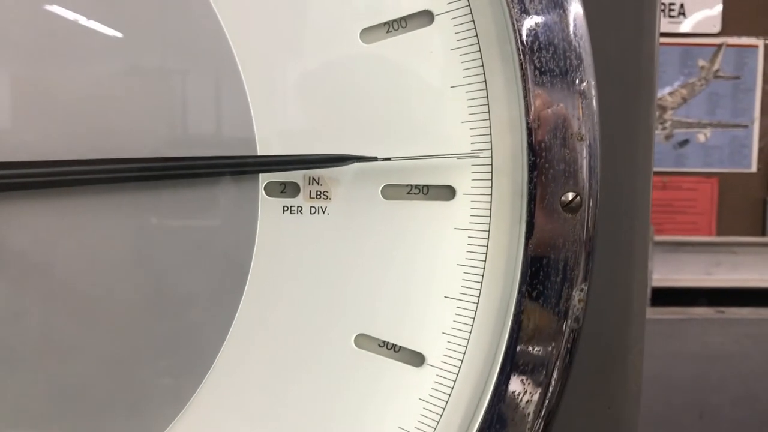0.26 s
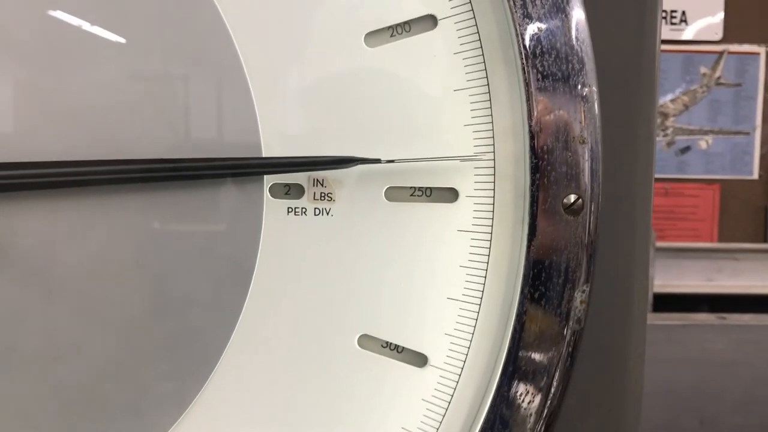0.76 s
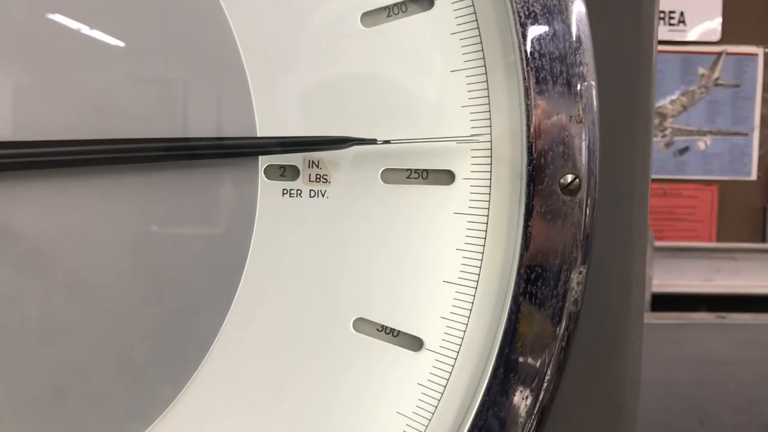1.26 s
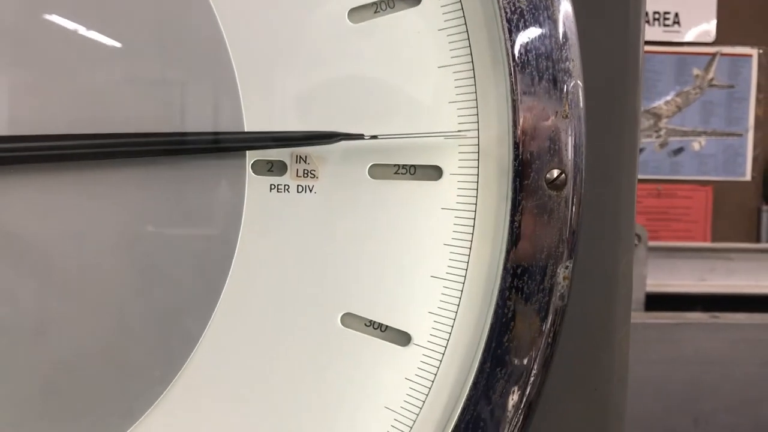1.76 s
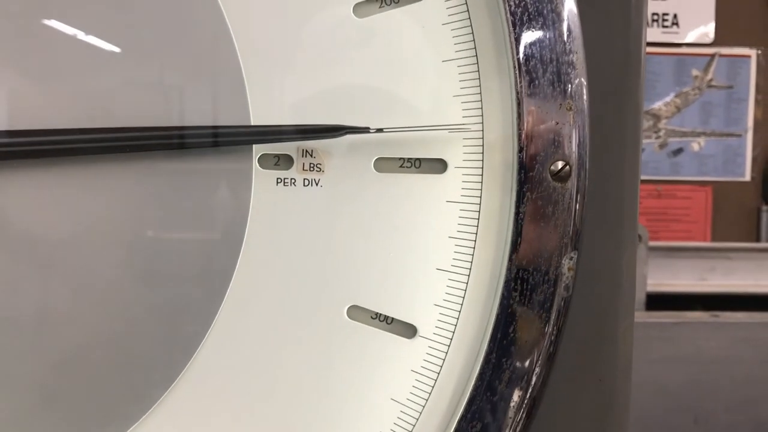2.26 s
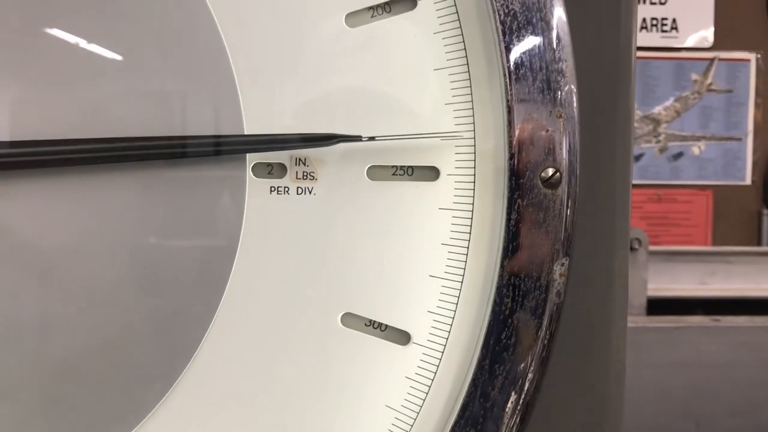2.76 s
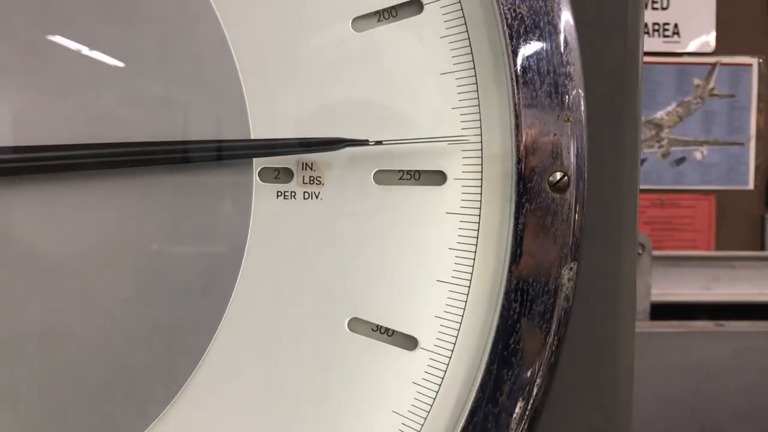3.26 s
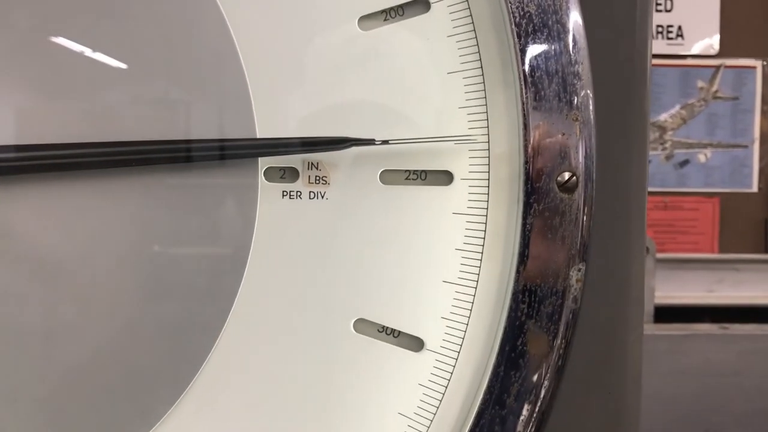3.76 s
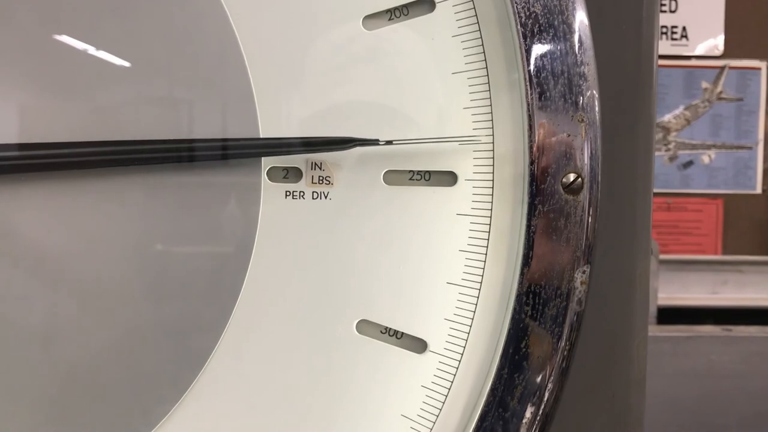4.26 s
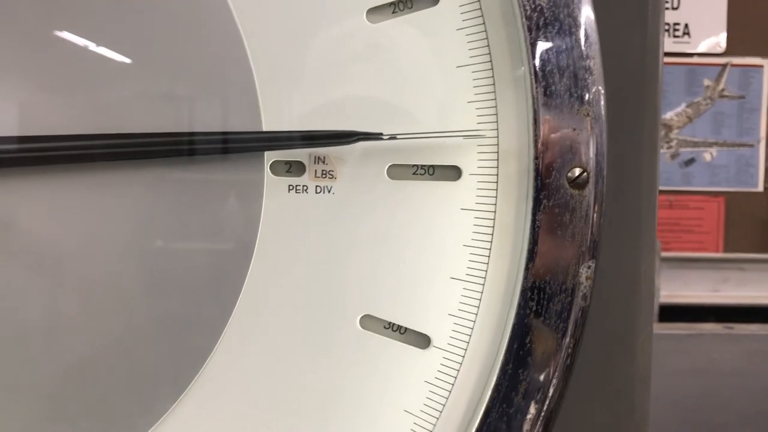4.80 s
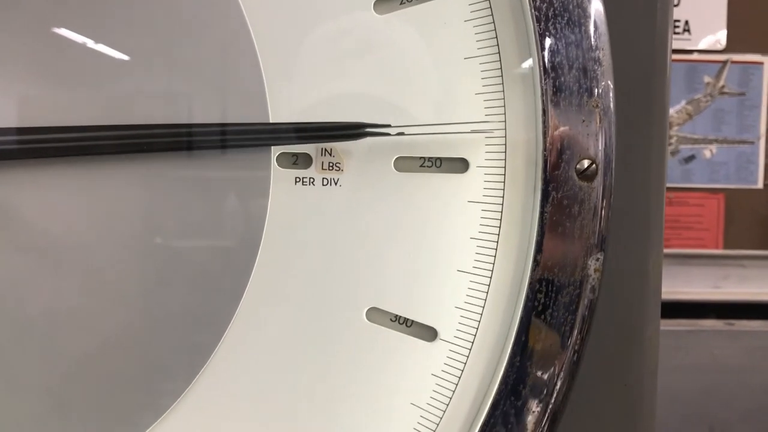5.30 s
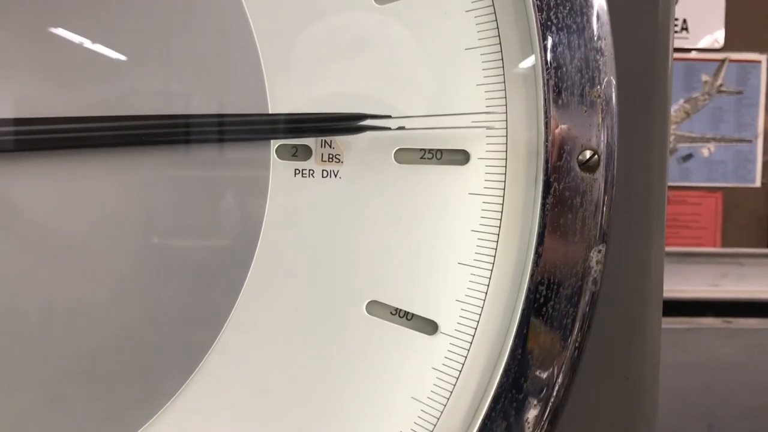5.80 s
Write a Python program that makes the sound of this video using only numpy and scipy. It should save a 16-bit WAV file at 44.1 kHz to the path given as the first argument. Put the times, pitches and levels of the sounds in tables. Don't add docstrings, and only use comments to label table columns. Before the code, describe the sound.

In a lab, close to the microphone, an electric drive idles with soft mains hum, faint motor whines and fan air. After about a second a loading drive engages: a strong, rough buzz swells up with gear rumble and fizzing sheet-metal rattle. It gets heavier in small steps, its ringing tones changing, and continues to the end without stopping.

```python
import sys
import numpy as np
from scipy import signal
from scipy.fft import rfft, irfft, next_fast_len
from scipy.io import wavfile

SR = 44100
rng = np.random.default_rng(int(sys.argv[2]) if len(sys.argv) > 2 else 0)


def file_out(sig):
    cols = np.atleast_2d(sig).T
    lim = np.clip(cols, -1, 1)
    pcm = np.round(lim * 32767).astype(np.int16)
    wavfile.write(sys.argv[1], SR, pcm)


def voltage_ratio(level):
    return 10 ** (np.asarray(level, float) / 20)


N = 266441

MAINS_HZ = 59.964
ENGAGE_S, ENGAGE_RAMP_S = 1.38, 0.11


def seconds():
    return np.arange(N) / SR


def rms_one(x):
    return x / np.sqrt(np.mean(x ** 2) + 1e-20)


def rise(s, ramp, t=None):
    t = seconds() if t is None else t
    return np.clip((t - s) / ramp + .5, 0, 1)


def in_time(rows):
    s, db = np.transpose(rows)
    return np.interp(seconds(), s, db)


def at_hz(points, hz):
    point_hz, point_db = np.transpose(points)
    return np.interp(np.log(hz), np.log(point_hz), point_db)


def drift(rate):
    r = np.exp(-2 * np.pi * rate * 40 / SR)
    slow = signal.lfilter([1], [1, -2 * r, r * r], rng.standard_normal(N // 40 + 2002))
    slow = slow[2000:]
    return np.interp(np.arange(N) / 40, np.arange(len(slow)), rms_one(slow))


def resonance(x, hz, width):
    r = np.exp(-np.pi * width / SR)
    poles = [1, -2 * r * np.cos(2 * np.pi * hz / SR), r * r]
    return signal.lfilter([(1 - r * r) / 2, 0, (r * r - 1) / 2], poles, x)


def coloured(spectrum):
    size = next_fast_len(N)
    hz = np.arange(1, size // 2 + 2) * SR / size
    white = rfft(rng.standard_normal(size))
    return rms_one(irfft(white * voltage_ratio(at_hz(spectrum, hz)), size)[:N])


def struck(force, modes):
    size = 2 * (next_fast_len(N) // 2)
    hz = np.arange(size // 2 + 1) * SR / size
    power = 0
    for mode_hz, width, db in modes:
        power = power + voltage_ratio(db) ** 2 / (1 + (2 * (hz - mode_hz) / width) ** 2) ** 1.5
    cepstrum = irfft(np.log(power) / 2, size)
    cepstrum[1:size // 2] *= 2
    cepstrum[size // 2 + 1:] = 0
    return rms_one(irfft(rfft(force, size) * np.exp(rfft(cepstrum)), size)[:N])


# moment in seconds, change-over time in seconds.
STEPS = [
    (1.42, 0.2),
    (2.5, 0.091),
    (3.2, .08),
    (4.3, 0.087),
    (5.53, 0.055),
]


def step_shares():
    on = [rise(s, ramp) for s, ramp in STEPS] + [0]
    return np.array([this - following for this, following in zip(on, on[1:])])


# frequency in Hz, level in dB per Hz.
AIR = [(12, -72), (25, -20), (40, -5), (70, -6.5), (141, -6.5), (186, -9.5), (290, -13), (441, -17),
       (727, -22.5), (1420, -20.5), (2340, -29.5), (7000, -43.5), (10400, -49.5), (11500, -47.5),
       (15600, -46.5)]


def lab_air(shares):
    return voltage_ratio(-54 - 0.5 * (shares[0] + shares[1])) * coloured(AIR)


# frequency in Hz, level in dB rms, width in Hz.
WHINES = [(349, -66.5, 4.3), (620.7, -69, 2.7), (991.5, -70.5, 3.3), (1242, -73.5, 2.3), (1402, -72, 5.7),
          (1504, -76.5, 4.0), (1597, -77.5, 5.5), (837, -76.5, 3.0), (1197, -75, 2.5), (603, -74, 1.6),
          (2638, -87, 8.0), (6476, -96, 2.6)]


def whines():
    out = 0
    for hz, db, width in WHINES:
        out = out + voltage_ratio(db) * rms_one(resonance(rng.standard_normal(N), hz, width))
    return out


TICK_S, TICK_DB, TICK_T60_S = .897, -66, .2
SQUEAK_HZ, SQUEAK_DB, SQUEAK_FROM_S = 11140, -85, 3.7


def small_parts():
    since = seconds() - TICK_S
    decay = (since > 0) * voltage_ratio(TICK_DB - 60 * np.abs(since) / TICK_T60_S)
    tick = resonance(rng.standard_normal(N), 5000, 6000) * decay
    on = np.clip(drift(3.6) + .3, 0, 1) * (seconds() > SQUEAK_FROM_S)
    squeak = rms_one(resonance(rng.standard_normal(N), SQUEAK_HZ, 60))
    return tick + voltage_ratio(SQUEAK_DB) * on * squeak


# frequency in Hz, level in dB per Hz.
STRAIN = [(18, -51), (30, -14), (69, -19), (109, -12.5), (297, -13.5), (467, -18), (720, -23),
          (1180, -25.5), (1400, -29.5), (1950, -30.5), (2200, -34.5), (3550, -39.5), (5100, -42),
          (6000, -43), (9000, -52), (19800, -120)]
STRAIN_DB, STRAIN_FOLLOWS, STRAIN_LEAST_DB = -56, 0.79, -64
INRUSH_DB, INRUSH_S = 3.5, .2


def gear_strain(load_db):
    inrush_db = INRUSH_DB * (1 - rise(ENGAGE_S + INRUSH_S / 2, INRUSH_S))
    level_db = np.maximum(STRAIN_DB + STRAIN_FOLLOWS * load_db, STRAIN_LEAST_DB)
    return rise(1.26, .12) * voltage_ratio(level_db + inrush_db) * coloured(STRAIN)


# time in seconds, level in dB.
RATTLE = [
    (1.25, -88),
    (1.35, -79),
    (1.56, -73),
    (2.2, -70.5),
    (3.3, -71.5),
    (4.0, -68),
    (4.26, -68.5),
    (4.33, -72.5),
    (6.04, -73),
]
# frequency in Hz, width in Hz, level in dB.
SHEET = [(5760, 660, -12), (6540, 250, -5.5), (7054, 245, 1.6), (7440, 320, -7), (8030, 260, -4.5),
         (8600, 240, -1.5), (9060, 170, -7.5)]
# frequency in Hz, width in Hz, level in dB.
SHEET_TOP = [(8410, 580, 4), (9840, 770, 1.5), (11040, 500, 1.5), (11600, 500, 1.5), (12500, 900, -6),
             (13400, 500, -8), (14800, 1200, -.1)]
# frequency in Hz, width in Hz, level in dB.
CASING = [(2550, 135, 1.5), (3070, 190, 1), (3600, 290, 0.5), (4190, 190, -2), (4630, 130, 1),
          (5000, 230, 3)]
# delay in cycles, level in dB.
TAPS = [(.12, 0), (.17, -1), (.23, -2), (.31, -4), (.41, -7), (.55, -8), (.64, -9), (.9, -11)]
TOP_LOOSE_DB, TOP_SEATED_DB = -4.5, -14.5
CASING_DB, CASING_FOLLOWS = -72, 0.28


def rattle(load_db, seated):
    taps = np.zeros(N + SR)
    cycles = np.arange(int(N / SR * MAINS_HZ) + 1)
    for late, tap_db in TAPS:
        creep = .004 * drift(.7)[(cycles * SR / MAINS_HZ).astype(int)]
        at = (cycles + late + creep) * SR / MAINS_HZ
        size = voltage_ratio(tap_db + 1.5 * rng.standard_normal(len(cycles)))
        whole, part = at.astype(int), at % 1
        taps[whole] += size * (1 - part)
        taps[whole + 1] += size * part
    gate = 1 + 0.13 * np.cos(2 * np.pi * (MAINS_HZ * seconds() - .25))
    grit = .55 * gate * rng.standard_normal(N)
    force = rms_one(taps[:N]) + grit
    top_db = TOP_LOOSE_DB + (TOP_SEATED_DB - TOP_LOOSE_DB) * seated
    sheet = struck(force, SHEET) + voltage_ratio(top_db) * struck(force, SHEET_TOP)
    casing = voltage_ratio(CASING_DB + CASING_FOLLOWS * load_db) * rise(1.33, .2) * struck(force, CASING)
    return rise(1.25, .1) * (voltage_ratio(in_time(RATTLE) + 0.9) * sheet + casing)


# mains order, level in
# dB rms.
FRAME_ALWAYS = [(17, -68.5), (19, -68), (24, -80), (25, -71), (41, -74.5), (43, -76), (44, -83),
                (45, -84.5), (49, -77), (52, -79), (57, -87.5), (59, -80.5), (61, -81.5), (65, -93),
                (66, -83), (67, -101), (69, -82), (72, -77.5), (73, -89), (74, -84), (76, -96), (81, -91),
                (83, -78), (85, -82.5)]
# mains order, level in dB rms, start in seconds, end in seconds.
FRAME_WHILE = [(15, -67.5, 2.5, 6.9), (18, -66, 1.42, 4.8), (19, -64, 4.3, 5.53), (20, -61, 4.3, 6.2),
               (21, -73, 6.1, 6.8), (22, -71, 2.5, 6.2), (25, -65.5, 2.45, 3.24), (26, -69, 1.42, 3.1),
               (26, -66, 3.2, 5.53), (27, -70, 4.3, 5.53), (28, -65, 1.6, 2.54), (28, -66, 4.3, 7),
               (29, -68.5, 1.3, 2.56), (29, -68, 4.3, 7.4), (31, -71, 2.5, 7.1), (32, -71.5, 2.5, 3.2),
               (33, -68.5, 1.3, 5.53), (36, -73.5, 4.9, 6.2), (40, -77, 1.3, 5.53), (59, -73.5, 4.3, 6.2),
               (60, -78, 2.3, 6.2), (77.5, -77.5, 1.4, 6.2), (78, -76.5, 1.3, 2.9), (84, -73.5, 2.5, 4.3),
               (12, -70.5, 3.9, 6.2), (37, -82, 5.53, 6.2), (44, -78.5, 1.3, 2.7), (44, -77, 5.53, 6.2),
               (46, -78, 1.2, 2.7), (46, -79, 3.5, 6.2)]
SING_RAMP_S, OFF_TUNE_DB = 0.045, -11.5


def picked_orders(t, loaded):
    picked = {round(order): voltage_ratio(db) * loaded for order, db in FRAME_ALWAYS}
    for order, db, start, end in FRAME_WHILE:
        tuned = rise(start, SING_RAMP_S, t) - rise(end, SING_RAMP_S, t)
        level = voltage_ratio(db) * loaded * np.maximum(tuned, voltage_ratio(OFF_TUNE_DB))
        picked[round(order)] = np.maximum(picked.get(round(order), 0), level)
    return picked


# frequency in Hz, level in dB rms.
OTHER_ORDERS = [(600, -95), (750, -90.5), (1000, -81.5), (1500, -80), (2200, -88.5), (3000, -89),
                (4000, -88.5), (5300, -88.5)]


def frame_song(shares):
    out = np.zeros(N)
    chance = rng.normal(0, 1, (90, 6))
    turn = np.cumsum(0.266 * chance[:, 5] - .35)
    step, start = 32, int(1.2 * SR)
    wavers = [voltage_ratio(1.2 * drift(5.5))[start::step] for _ in range(16)]
    t, slow_shares = seconds()[start:], shares[:, start::step]
    cycle = np.exp(2j * np.pi * (MAINS_HZ * t % 1)).astype(np.complex64)
    wave = cycle ** 10
    picked = picked_orders(t[::step], slow_shares.sum(axis=0))
    for order in range(11, 90):
        wave = wave * cycle
        level_db = at_hz(OTHER_ORDERS, order * MAINS_HZ) + 3.2 * chance[order, :5]
        level = picked.get(order, voltage_ratio(level_db) @ slow_shares)
        level = level * wavers[order % 16] * np.exp(2j * np.pi * turn[order])
        out[start:] += (wave * np.repeat(level.astype(np.complex64), step)[:N - start]).real
    return np.sqrt(2) * out


# mains order, idle level in dB, full-load level in dB, share of the torque swing (1
# follows it fully), change once seated in dB.
ORDERS_LOW = [(2, -50.5, -48.5, 1.1, -3.5), (3, -77, -48.5, 1, -1), (4, -51.7, -42.5, 0.5, 1),
              (5, -79, -42, 1.01, 0.14), (6, -81, -47.5, 0.76, 1), (7, -84, -56.5, 0.07, -1.5),
              (8, -85, -57, 0.45, -8), (9, -86, -66.5, 0.26, 0.8), (10, -85, -63.5, .45, -5)]
# gain at the peak in dB, curvature of the swell.
BOOM = [(5.5, 1.4), (3, 0.066)]
BOOM_FROM_S, BOOM_PEAK_S, BOOM_RELEASE_S = 4, 5.45, 0.17
EVEN_LEAD, ODD_LEAD, ODD_LAG = -.85, -1.65, .011
PLATE_HZ, PLATE_WIDTH_HZ = 190, 200


def hum(load_db, seated):
    boom = np.interp(seconds(), [BOOM_FROM_S, BOOM_PEAK_S, BOOM_PEAK_S + BOOM_RELEASE_S], [0, 1, 0])
    engaged = rise(ENGAGE_S, ENGAGE_RAMP_S)
    out = 0
    for row, (boom_db, bend) in zip(ORDERS_LOW, BOOM + [(0, 1)] * 7):
        order, idle_db, full_db, share, seated_db = row
        order = round(order)
        hz = order * MAINS_HZ
        pull = engaged * voltage_ratio(full_db + share * load_db + seated_db * seated)
        level = np.hypot(voltage_ratio(idle_db), pull) * voltage_ratio(boom_db * boom ** bend)
        if order % 2:
            lead = ODD_LEAD - 2 * np.pi * order * ODD_LAG
        else:
            lead = EVEN_LEAD - np.arctan2(PLATE_WIDTH_HZ * hz, PLATE_HZ ** 2 - hz ** 2)
        wave = np.cos(2 * np.pi * hz * seconds() + lead)
        out = out + np.sqrt(2) * level * voltage_ratio(0.36 * drift(7.1)) * wave
    return out


# time in seconds, level in dB.
LOAD = [(1.25, -75), (1.29, -80), (1.34, -65), (1.4, -63.5), (1.46, -60.5), (1.56, -52.5), (3.14, -47.5),
        (3.29, -45), (4.33, -45), (4.42, -43), (5.11, -42), (5.73, -43), (5.95, -42.5), (6.04, -42.5)]
FULL_LOAD_DB = -42
SEATED_STEP = 3


def scene():
    shares = step_shares()
    load_db = in_time(LOAD) - FULL_LOAD_DB
    seated = shares[SEATED_STEP:].sum(axis=0)
    background = lab_air(shares) + whines() + small_parts()
    load = gear_strain(load_db) + rattle(load_db, seated) + frame_song(shares) + hum(load_db, seated)
    return (background + load)[None]


def roll_off(x):
    return signal.sosfilt(signal.butter(12, 15730, fs=SR, output="sos"), x)


# centre in seconds, empty time in seconds, edge in
# Hz, two spared bands in Hz (none if below the edge).
DROPOUTS = [(0.033, .043, 1680, 2150, 2700), (.094, 0, 2700, 0, 0), (.309, 0, 2720, 0, 0),
            (.565, 0, 2700, 0, 0), (.715, 0, 2170, 3000, 6502), (.841, 0.045, 1750, 2203, 2698),
            (.99, 0, 2000, 0, 0), (1.033, 0, 2600, 0, -1), (1.118, 0, 2250, 2750, 6152),
            (1.183, 0, 2700, 0, 0), (1.227, 0.00092, 2300, 2800, 3650), (1.288, 0.00098, 2270, 3000, 3606),
            (1.375, 0, 1950, 0, 4357), (1.929, 0, 2100, 2596, 4298), (2.198, 0.016, 2200, 3198, 4650),
            (2.507, 0, 2540, 3700, 4694), (2.739, 0, 2620, 4402, 4902), (2.889, 0, 2150, 0, 4700),
            (2.956, 0, 2200, 2998, 4700), (3.058, 0.0017, 2280, 0, 4800), (3.957, 0, 2100, 0, 7),
            (4.445, 0, 2240, 2900, 4972), (5.238, 0.000096, 2200, 0, 3500)]
FADE_S = 1024 / 48000
LOUD_SHEET_HZ, LOOSE_FROM_S, LOOSE_TO_S = 7050, 1.6, 4.3


def record(dry):
    out, pad = dry.copy(), int(.1 * SR)
    for s, empty, edge_hz, *bands_hz in DROPOUTS:
        a, b = max(int(s * SR) - pad, 0), int(s * SR) + pad
        hz = np.arange((b - a) // 2 + 1) * SR / (b - a)
        lost = 1. * (hz > edge_hz)
        spared = [band for band in bands_hz if band > edge_hz]
        if LOOSE_FROM_S < s < LOOSE_TO_S:
            spared.append(LOUD_SHEET_HZ)
        for centre_hz in spared:
            half_width = 110 + 7e3 * empty * (s > 1)
            lost[np.abs(hz - centre_hz) < half_width] = -.7
        treble = irfft(rfft(dry[:, a:b]) * lost, b - a)
        away = np.clip((np.abs(np.arange(a, b) / SR - s) - empty / 2) / FADE_S, 0, 1)
        out[:, a:b] -= treble * (1 - np.sin(np.pi / 2 * away))
    return roll_off(out)


dry = scene()
out = record(dry)
file_out(out)
```